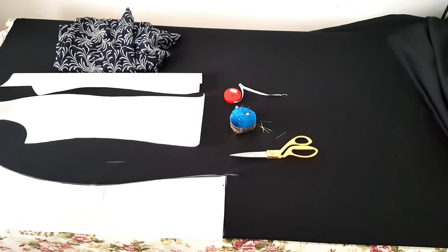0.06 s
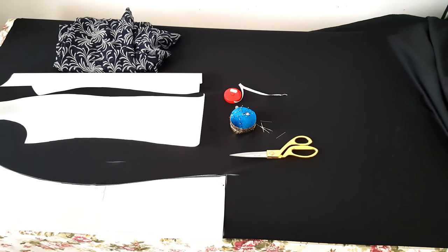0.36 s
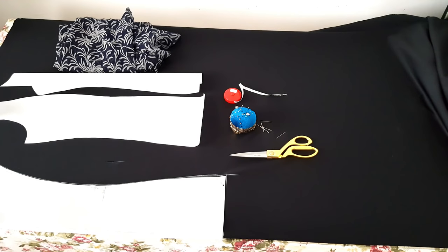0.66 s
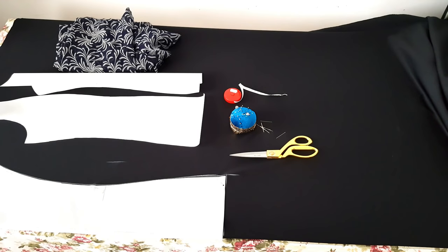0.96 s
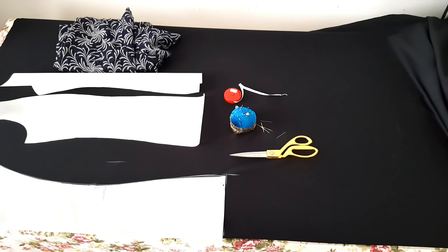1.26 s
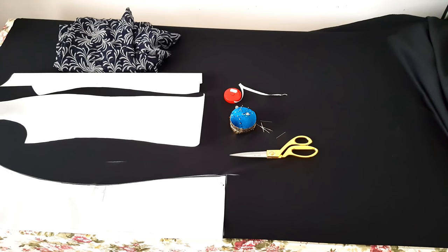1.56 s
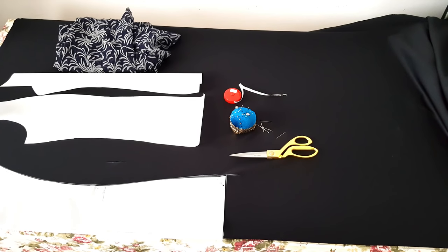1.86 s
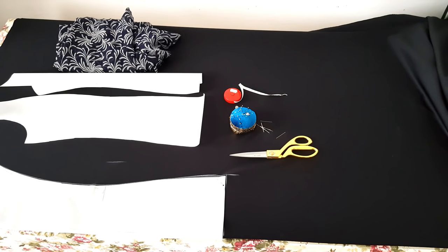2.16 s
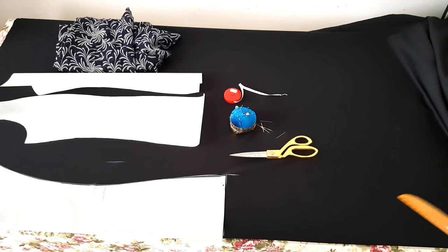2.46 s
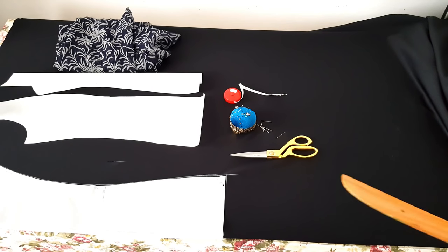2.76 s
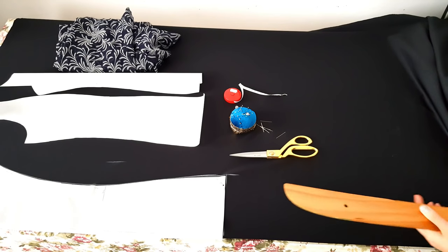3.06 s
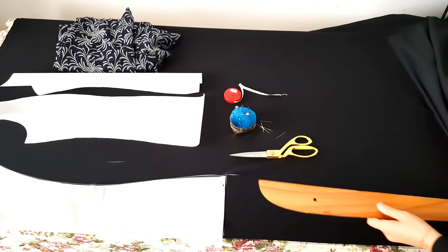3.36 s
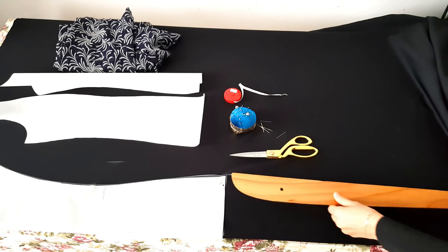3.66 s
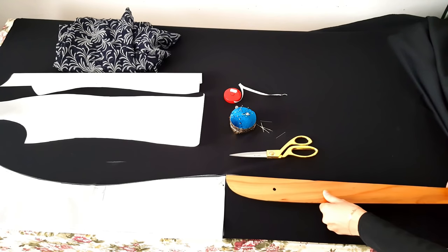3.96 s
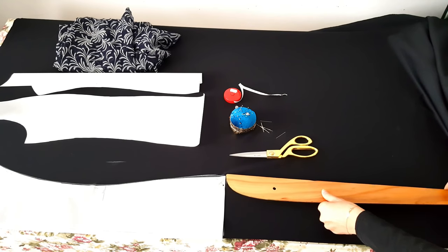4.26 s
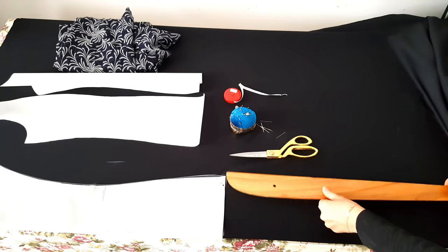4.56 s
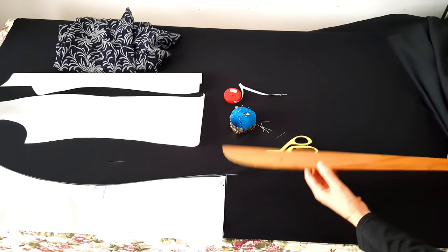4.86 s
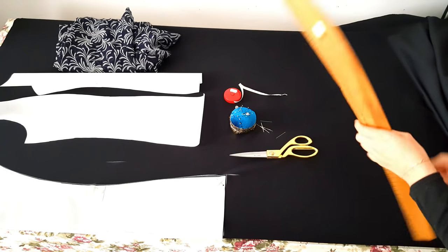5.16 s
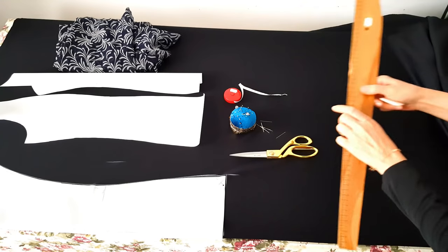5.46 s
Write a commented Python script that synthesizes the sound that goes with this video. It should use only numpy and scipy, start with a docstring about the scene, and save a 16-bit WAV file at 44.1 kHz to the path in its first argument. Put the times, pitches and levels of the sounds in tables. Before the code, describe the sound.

At about 0.4 seconds a hard tool lands on a table with a sharp clack and a dull bump, by far the loudest sound, echoing briefly in a small room. It is pushed aside with a short scrape around 0.6 seconds. From 1.2 to 2.5 seconds there are only faint dull bumps, low thuds and a shuffling foot. Soft brushing of wood and cloth comes between 2.2 and 3 seconds. At about 3.2 seconds a wooden ruler touches down on the cloth-covered table with a light, briefly ringing tap and a faint slide. After a quiet stretch, a fainter click at 4.8 seconds comes as the ruler is lifted, with soft rustles and small bumps around 5 seconds. A short scrape at 5.4 seconds and more rubbing near 5.7 seconds follow as it is turned. Faint microphone hiss, hum and room rumble continue throughout.

```python
"""A hard tool clacks down in a small room: the impact excites its resonances and the reverberation.
The tailor pushes it aside and steps up with a long wooden ruler, which taps the cloth-covered table,
rings briefly, slides, is lifted, turned through the hands and laid down again. Each slide is friction,
a dense train of tiny clicks filtered by the body that is rubbed. The cloth rustles softly over dull
bumps, low thuds, room rumble, a faint hum and microphone hiss."""
import sys
import numpy as np
from scipy import signal
from scipy.fft import rfft, irfft
from scipy.io import wavfile
from scipy.ndimage import uniform_filter1d

SR = 44100
rng = np.random.default_rng(int(sys.argv[2]) if len(sys.argv) > 2 else 0)


def put_to_file(sound):
    """Save the sound as 16-bit audio at rate SR, in the file named by the first command-line argument."""
    columns = np.atleast_2d(sound).T  # one column per channel
    safe = np.clip(columns, -1, 1)
    whole_steps = np.round(safe * 32767)
    wavfile.write(sys.argv[1], SR, whole_steps.astype(np.int16))


N = 251722
TIME = np.arange(N) / SR

# resonances of the wooden ruler: f/Hz, bandwidth/Hz, level/dB
RULER_MODES = [(1643, 94, 16), (2010, 64, 13), (2382, 70, 13), (3230, 120, 14), (4580, 130, -1),
               (5390, 74, 12.5)]


def tool_clack(tick_lead_s=.0002, tick_db=-22.0):
    """Impulse excitation: a corner of the tool ticks on the surface, then the sharp blow rings its modes."""
    # impact: t/s, level/dB
    impacts = [(0.426, 2)]
    # spectra of the blow and of the corner's tick: f/Hz, level/dB
    blow_spectrum = [(60, -32.5), (130, -17.5), (220, -21), (290, -17.5), (600, -17.5), (1300, -15),
                     (2300, -8.5), (3800, -10), (5300, -7), (6800, -9.5), (8500, -15), (12000, -18.5),
                     (15500, -23.5)]
    tick_spectrum = [(3000, -23), (7000, -5), (10500, -8.5), (14500, -3.5)]
    # resonances of the landing tool: f/Hz, bandwidth/Hz, level/dB
    modes = [(276, 42.5, 11.5), (860, 60, 5), (1380, 200, 4.5), (2220, 45, 9), (3040, 55, 4.5),
             (5270, 1800, 7.5)]
    out = np.zeros(N)
    for t, db in impacts:
        add(out, t - tick_lead_s, gain_of(db + tick_db) * body_response(tick_spectrum))
        add(out, t, gain_of(db) * body_response(blow_spectrum, modes=modes))
    return room(out, wet_db=7.5, pan_db=5.5, build_s=0.0085) * gain_of([[.4], [-.9]])


def ruler_taps():
    """Damped free vibration: the ruler touches down with a small crunch and rings briefly."""
    # touches: t/s, level/dB, contact time/s, tilt/(dB per octave), resonance boost/dB
    touches = [(3.161, -20.5, 0.001, -1.5, -9.5), (4.765, -36.5, 0.00084, 0.5, -5)]
    # spectrum of a tap: f/Hz, level/dB
    spectrum = [(200, -14.5), (1000, -8), (1350, -13), (1750, -2), (2100, 0.5), (2800, -10.5), (4300, 2),
                (5600, 2), (6800, -3), (8500, -6), (11500, -13.5), (15500, -38.5)]
    out = np.zeros(N)
    for t, db, contact_s, tilt, ring_db in touches:
        tap = signal.fftconvolve(contact_force(contact_s), body_response(spectrum, tilt, RULER_MODES, ring_db))
        add(out, t, gain_of(db) * tap)
    return room(out, wet_db=6.0, pan_db=3.0, build_s=0.0056) * gain_of([[1], [-1]])


def bumps():
    """Cushioned impacts of handling and steps; the nearer one is, the more direct sound outweighs the room."""
    # soft blows: t/s, level/dB, contact time/s, tilt/(dB per octave), nearness (0 to 1)
    blows = [(0.141, -34.5, 0.01, 4, 0.27), (0.3896, -17, 0.0087, -1.5, 0), (0.3971, -20.5, 0.0024, 0, 0.4),
             (.409, -25, 0.0072, 4, 0.4), (.419, -21.5, 0.0028, 1, 0.5), (0.563, -31, 0.004, -4.5, 0.64),
             (1.204, -42.5, 0.0092, 4.5, 0.2), (1.268, -38.5, 0.014, 0.5, 0), (2.075, -41.5, 0.019, 0, 0.2),
             (2.34, -40, 0.027, 2, 0.17), (2.499, -43, 0.027, -0.5, 0.25), (4.98, -37.5, 0.0033, 7, 0.3),
             (5.002, -38.5, 0.0035, 0.5, 0.7)]
    # spectrum of a dull blow: f/Hz, level/dB
    spectrum = [(50, -32), (120, -11.5), (210, -13.5), (275, 1.5), (450, 1.5), (700, -8), (950, -13.5),
                (1600, -19), (2600, -18.5), (4000, -26.5), (7500, -32), (12000, -51.5)]
    close, far = np.zeros((2, N))
    for t, db, contact_s, tilt, nearness in blows:
        blow = gain_of(db) * signal.fftconvolve(contact_force(contact_s), body_response(spectrum, tilt))
        add(close, t, nearness * blow)
        add(far, t, (1 - nearness) * blow)
    return close + room(far, wet_db=7.5, pan_db=1.0)


def tool_scrapes():
    """Forced vibration: friction drives the tool's resonances as it is pushed aside."""
    # pushes: t/s at peak speed, level/dB, rise/s, fall/s, tilt/(dB per octave), resonance boost/dB
    pushes = [(.622, -49.5, 0.024, 0.0049, -0.5, 2), (.636, -45.5, 0.0053, 0.007, 2, -1),
              (.65, -42, 0.0084, 0.0037, -0.5, 3.5), (.685, -58.5, 0.014, 0.016, -2.5, -21)]
    # spectrum of the scrape: f/Hz, level/dB
    spectrum = [(300, -25), (700, -18), (950, -16), (1300, -19), (2100, -5), (3600, -11), (4600, -7),
                (6500, -9), (9000, -21), (12000, -26), (15500, -45)]
    # resonances of the sliding tool: f/Hz, bandwidth/Hz, level/dB
    modes = [(912, 55, 4.9), (2070, 15, 8.7), (2953, 15, 13), (3770, 97, 2.5), (4480, 140, 3.8),
             (5950, 57, 2)]
    return friction_strokes(pushes, spectrum, modes)


def ruler_drags():
    """Stick-slip excitation: the ruler's edge catches on the cloth and drives the modes of the wood."""
    # drags: t/s at peak speed, level/dB, rise/s, fall/s, tilt/(dB per octave), resonance boost/dB
    drags = [(3.237, -61.5, 0.019, 0.025, -0.5, -16), (5.429, -47.5, 0.0093, 0.0054, 1.5, 2)]
    # spectrum of the dragging edge: f/Hz, level/dB
    spectrum = [(300, -22), (1300, -15.5), (1650, -9), (2800, -4.5), (4500, 0), (6800, -0.5), (8700, -7),
                (11300, -6.5), (15500, -16)]
    return friction_strokes(drags, spectrum, RULER_MODES)


def ruler_slides(pan_db=0.2):
    """Friction noise: wood on cloth and hands gives a resonant rub and a fizz of fibres; powers add."""
    # strokes: t/s at peak speed, rub level/dB, rise/s, fall/s, fizz level/dB relative to the rub
    strokes = [(2.19, -67.5, 0.068, 0.17, 2), (2.475, -64.5, 0.073, 0.05, 1),
               (2.7, -61.5, 0.027, 0.036, 1.5), (2.75, -61, 0.023, 0.059, -16),
               (2.795, -57, 0.0097, 0.027, -9), (2.965, -68, 0.035, 0.081, -0.5),
               (4.74, -71, 0.03, 0.04, 13), (4.79, -62, 0.021, .025, -10), (4.843, -60.5, .015, 0.041, 5),
               (5.04, -63, .022, 0.056, 7), (5.115, -56.5, .032, 0.04, 3), (5.59, -59, 0.039, 0.059, -2),
               (5.697, -52.5, 0.017, 0.036, 6)]
    # spectra of the rub and of the fibres: f/Hz, level/dB
    rub_spectrum = [(1200, -24), (1900, -14), (2300, -2), (3400, -7.5), (4400, -3), (5800, -5), (7500, -4),
                    (9500, -16), (14000, -30)]
    fizz_spectrum = [(3000, -21.5), (5200, 4), (7000, 2.5), (8700, 0.5), (11500, 1), (15500, -7.5)]
    # resonances of the rubbed ruler before the grip shifts them: f/Hz, bandwidth/Hz, level/dB
    modes = [(2570, 160, 1.5), (2900, 260, -6), (5030, 3300, 4.5)]
    # positions of the hand on the ruler: t/s of taking hold, factor on the resonance frequencies
    grips = [(0, 1.12), (4, .88), (5.35, 1.04)]
    grain = unit_rms(room(stick_slip(spread_db=2.5, per_s=5500), wet_db=11, pan_db=8.5))
    # time reversal decorrelates the fizz from the rub
    fizz = unit_rms(convolve(grain[:, ::-1], body_response(fizz_spectrum)))
    rub_power, fizz_power = np.zeros((len(grips), N)), np.zeros(N)
    for t, db, rise, fall, fizz_db in strokes:
        effort = gain_of(db) * swell(t, rise, fall)
        grip = sum(t > since for since, _ in grips) - 1
        rub_power[grip] += effort ** 2
        fizz_power += (effort * gain_of(fizz_db)) ** 2
    out = np.sqrt(fizz_power) * fizz
    for power, (_, shift) in zip(rub_power, grips):
        held_modes = [(hz * shift, width, db) for hz, width, db in modes]
        rub = unit_rms(convolve(grain, body_response(rub_spectrum, modes=held_modes)))
        out += np.sqrt(power) * rub
    return out * gain_of([[pan_db], [-pan_db]])


def foot_shuffles():
    """Sliding friction without resonances: a shuffling foot makes faint broadband noise."""
    # shuffles: t/s at peak speed, level/dB, rise/s, fall/s, tilt/(dB per octave), resonance boost/dB
    shuffles = [(1.755, -70.5, 0.083, 0.098, -1.3, 0), (3.115, -73.5, 0.042, 0.045, -0.48, 0)]
    # spectrum of the sliding foot: f/Hz, level/dB
    spectrum = [(200, -9), (400, 2), (700, -3.5), (1300, 3), (2500, -5), (5000, 2), (7500, -2), (9500, -15),
                (15000, -22.5)]
    return friction_strokes(shuffles, spectrum, modes=())


def floor_thuds(rise_s=0.045, fall_s=.04):
    """Structure-borne sound: steps and loads press on floor and table, raising swells of deep noise."""
    # loads: t/s, level/dB
    loads = [(.46, -59), (1.38, -64), (1.81, -60.5), (2.11, -65), (2.542, -57.5), (5.04, -64.5)]
    # spectrum of a thud: f/Hz, level/dB
    spectrum = [(15, -10.5), (28, -3.5), (50, -1), (90, 3.5), (130, -11.5), (200, -16), (400, -39.5)]
    envelope = sum(gain_of(db) * swell(t, rise_s, fall_s) for t, db in loads)
    return envelope * steady_noise(spectrum)


def hum(waver_hz=6):
    """Random frequency modulation: two faint, low tones waver in pitch."""
    # tones: f/Hz, level/dB
    tones = [(118, -86), (192, -79)]
    out = np.zeros(N)
    for hz, db in tones:
        drift = unit_rms(uniform_filter1d(rng.standard_normal(N), size=2500))
        phase = 2 * np.pi * np.cumsum(hz + waver_hz * drift) / SR
        out += gain_of(db) * np.sin(phase)
    return out


def noise_floor(hiss_db=-65.5, rumble_db=-69.5):
    """Stationary noise: microphone hiss lies over the low rumble of the room."""
    # spectra of the broadband background and of the rumble: f/Hz, level/dB
    hiss = [(59, -31), (100, -12), (123, -3), (146, -16), (181, -10), (214, -20), (248, -20.5), (270, -24),
            (340, -23), (378, -25), (477, -26), (998, -28.5), (1920, -28), (8230, -32.5), (15500, -31.5)]
    rumble = [(15, -28), (25, -11), (45, -1.5), (85, 0.5), (110, -9), (180, -10.5), (260, -27),
              (500, -63.5)]
    return gain_of(hiss_db) * steady_noise(hiss) + gain_of(rumble_db) * steady_noise(rumble)


def contact_force(contact_s):
    """A blow through cloth is a sum of many small contacts: a noise burst of unit energy."""
    u = np.arange(0, 8 * contact_s, 1 / SR) / contact_s
    force = rng.standard_normal(len(u)) * np.sqrt(u) * np.exp(-u)
    return force / np.linalg.norm(force)


def stick_slip(spread_db, per_s):
    """Stick-slip friction: threads catch and let go in dense, tiny clicks of very uneven size."""
    size = gain_of(spread_db * np.minimum(rng.exponential(1, N), 4))
    return unit_rms(size * rng.standard_normal(N) * (rng.random(N) < per_s / SR))


def friction_strokes(strokes, spectrum, modes):
    """Source and filter: friction grows and fades with sliding speed and sounds through a body."""
    out, grain = np.zeros(N), stick_slip(spread_db=3.5, per_s=8000)
    for t, db, rise, fall, tilt, ring_db in strokes:
        speed = np.exp(-.5 * ((TIME - t) / np.where(TIME < t, rise, fall)) ** 2)
        out += gain_of(db) * convolve(grain * speed, body_response(spectrum, tilt, modes, ring_db))[0]
    return room(out, wet_db=6.0, pan_db=3.6, build_s=0.00083)


def swell(t, rise, fall):
    """Envelope of a movement: a Gaussian rise to time t, a rounded top and an exponential decay."""
    u = (TIME - t) / np.where(TIME < t, rise, fall)
    return np.exp(np.where(u < 0, -.5 * u ** 2, 1 - np.sqrt(1 + u ** 2)))


def body_response(spectrum, tilt=0, modes=(), ring_db=0, size=4096):
    """Minimum-phase impulse response of unit energy from a spectrum, a tilt and Lorentzian resonances."""
    hz = abs(np.fft.fftfreq(size, 1 / SR))
    ring = 1 + sum(gain_of(db + ring_db) ** 2 / (1 + (2 * (hz - f) / width) ** 2)
                   for f, width, db in modes)
    gain = gain_of(value_at(spectrum, hz) + tilt * np.log2(np.maximum(hz, 20))) * np.sqrt(ring)
    log_gain = np.log(np.maximum(gain / gain.max(), 1e-5))
    kernel = np.fft.ifft(np.exp(signal.hilbert(log_gain).conj())).real
    return kernel / np.linalg.norm(kernel)


def room(x, wet_db, pan_db, build_s=0.0047, lag_samples=5):
    """Reverberation: direct sound, early reflections, then a diffuse tail that decays band by band."""
    # reflections from table and walls: delay/s, left gain, right gain
    reflections = [(.0011, 0.25, 0.25), (.0051, .35, 0.22), (.0063, .21, 0.17), (.0087, .4, .2),
                   (.0099, .21, .2), (.018, .24, 0.28), (0.0206, .48, .25)]
    # reverberation time: f/Hz, T60/s
    t60 = [(100, 0.26), (400, 0.29), (2000, 0.31), (4000, 0.31), (6500, 0.28), (14000, 0.27)]
    arrivals = rng.standard_normal((2, SR)) * (rng.random((2, SR)) < .35)
    hz, t, bands = signal.stft(microphone_pair(arrivals), SR, nperseg=256)
    decay = gain_of(-60 * t / value_at(t60, hz)[:, None])
    tail = signal.istft(bands * decay, SR, nperseg=256)[1]
    tail *= 1 - np.exp(-np.arange(tail.shape[1]) / SR / build_s)
    response = gain_of(wet_db) * tail / np.linalg.norm(tail[0])
    response[0, 0] += gain_of(pan_db)  # direct sound reaches the left microphone first
    response[1, lag_samples] += gain_of(-pan_db)
    for delay, left, right in reflections:
        response[0, round(delay * SR)] += left
        response[1, round(delay * SR) + rng.integers(-20, 20)] += right
    return convolve(x, response)


def microphone_pair(x):
    """Spatial coherence: two independent signals are mixed so that they agree most in the bass."""
    # likeness of left and right: f/Hz, correlation coefficient
    coherence = [(30, .7), (150, .45), (280, 0.54), (600, .35), (1300, 0.067), (15000, .02)]
    left, independent = rfft(x)
    shared = value_at(coherence, np.fft.rfftfreq(x.shape[1], 1 / SR))
    right = shared * left + np.sqrt(1 - shared ** 2) * independent
    return irfft([left, right], x.shape[1])


def steady_noise(spectrum):
    """Spectral shaping: white noise takes on a given spectrum at both microphones."""
    shape = gain_of(value_at(spectrum, np.fft.rfftfreq(N, 1 / SR)))
    noise = irfft(rfft(rng.standard_normal((2, N))) * shape, N)
    return unit_rms(microphone_pair(noise))


def gain_of(db):
    """Decibels to amplitude ratio."""
    return 10 ** (np.asarray(db) / 20)


def unit_rms(x):
    """Normalisation to an rms of 1."""
    return x / np.sqrt(np.mean(x ** 2) + 1e-20)


def value_at(points, hz):
    """Interpolation on a logarithmic frequency axis."""
    f, value = np.transpose(points)
    return np.interp(np.log(hz + 1), np.log(f + 1), value)


def add(mix, t, sound):
    """Superposition of a sound on the mix from time t."""
    part = mix[round(t * SR):][:len(sound)]
    part += sound[:len(part)]


def convolve(x, kernel):
    """Linear filtering by convolution, cut to the length of the scene."""
    return signal.fftconvolve(np.atleast_2d(x), np.atleast_2d(kernel), axes=1)[:, :N]


def scene():
    """Superposition: the pressures of all sources around the table add at the microphones."""
    scraping = tool_scrapes() + ruler_drags() + foot_shuffles()
    impacts = tool_clack() + ruler_taps() + bumps()
    return impacts + scraping + ruler_slides() + floor_thuds() + hum() + noise_floor()


def record(dry):
    """Soft saturation rounds off the highest peak; a low-pass filter then limits the bandwidth."""
    ceiling, cutoff_hz = .82, 15800
    soft = dry / (1 + (dry / ceiling) ** 6) ** (1 / 6)
    low_pass = signal.firwin(511, cutoff_hz, window=("kaiser", 9), fs=SR)
    return signal.oaconvolve(soft, low_pass[None], "same")


dry = scene()
out = record(dry)
put_to_file(out)
```